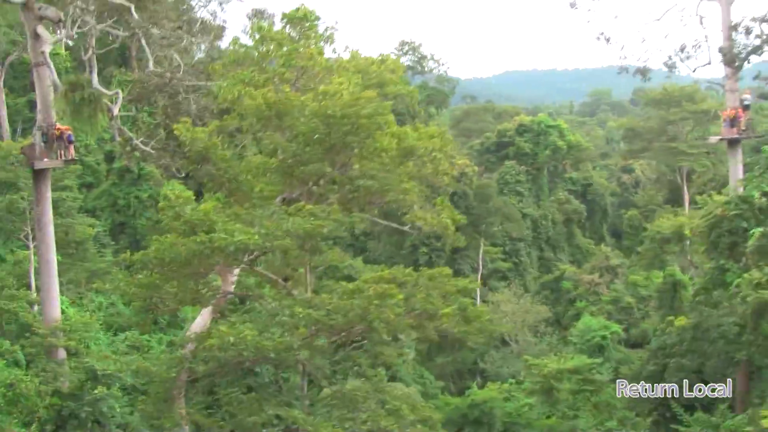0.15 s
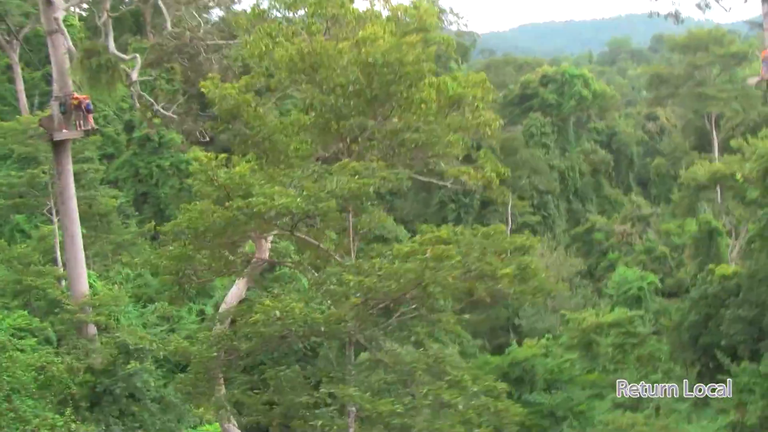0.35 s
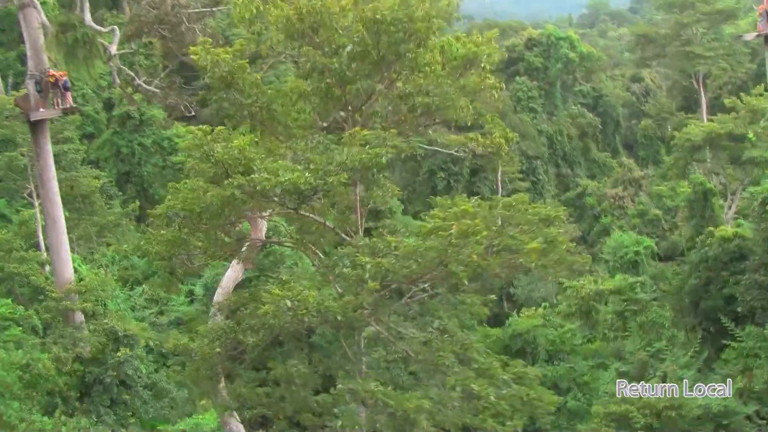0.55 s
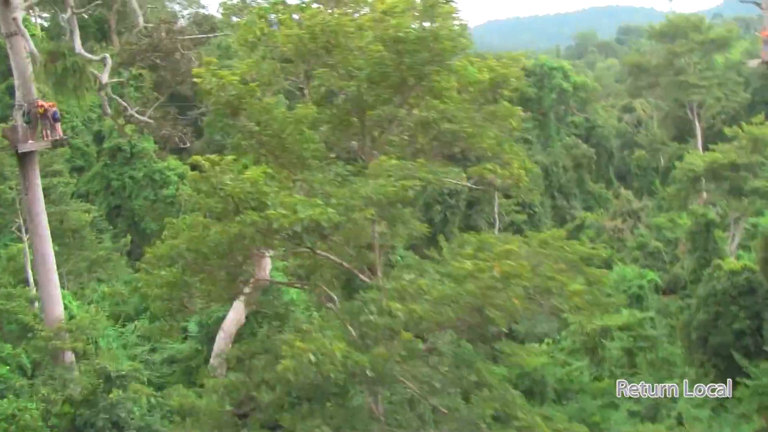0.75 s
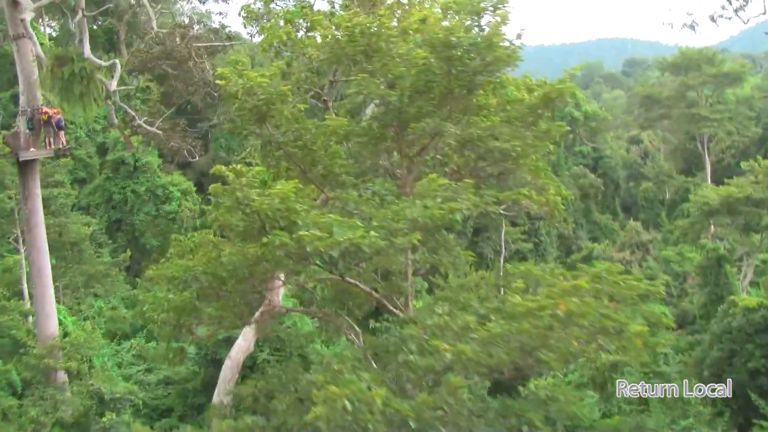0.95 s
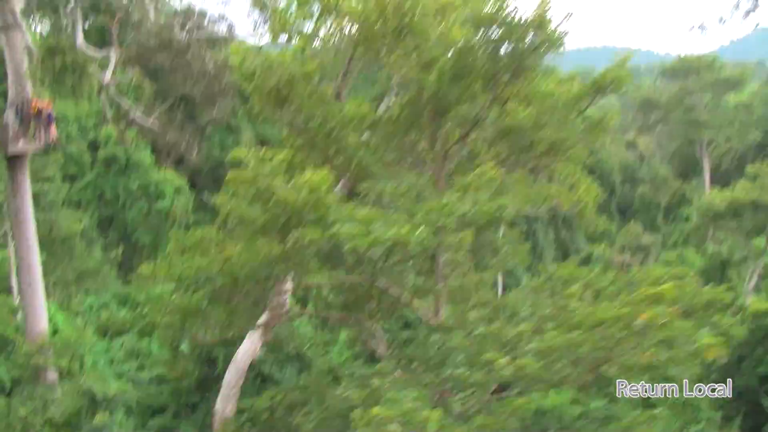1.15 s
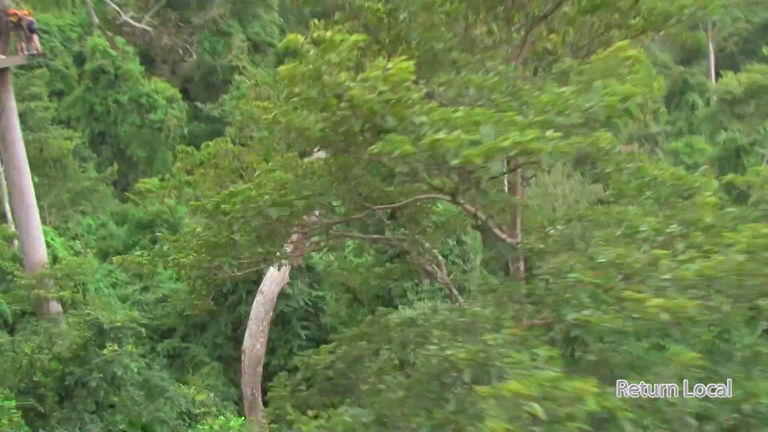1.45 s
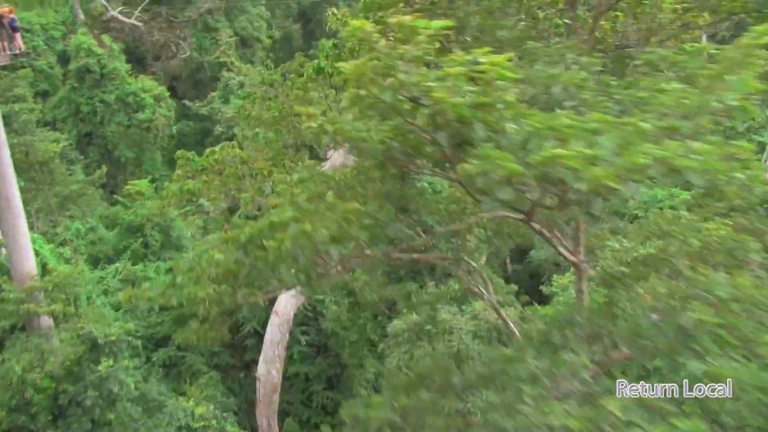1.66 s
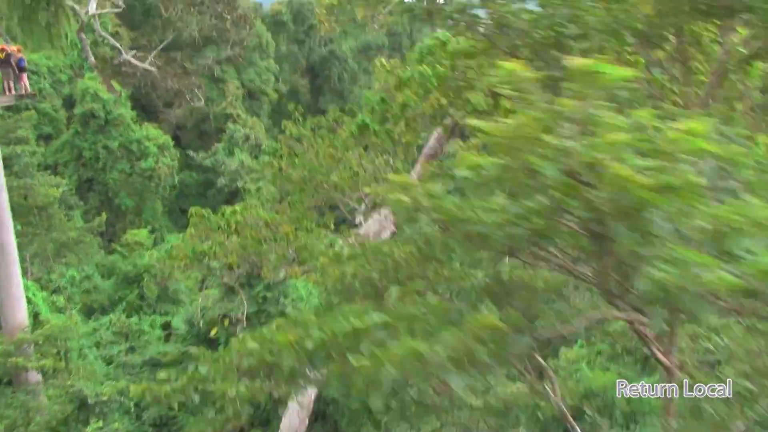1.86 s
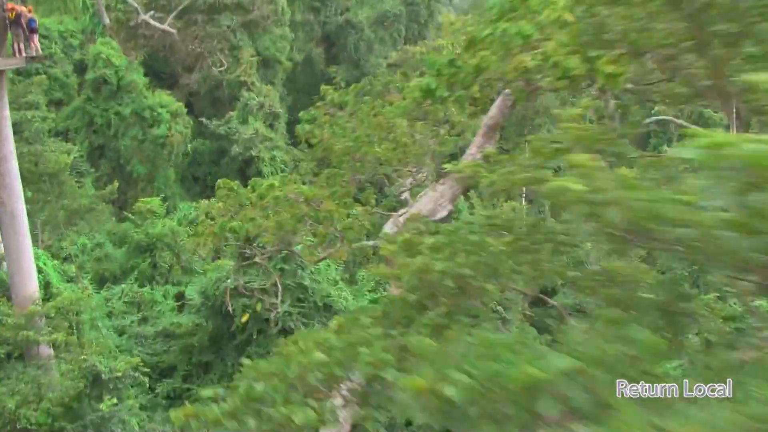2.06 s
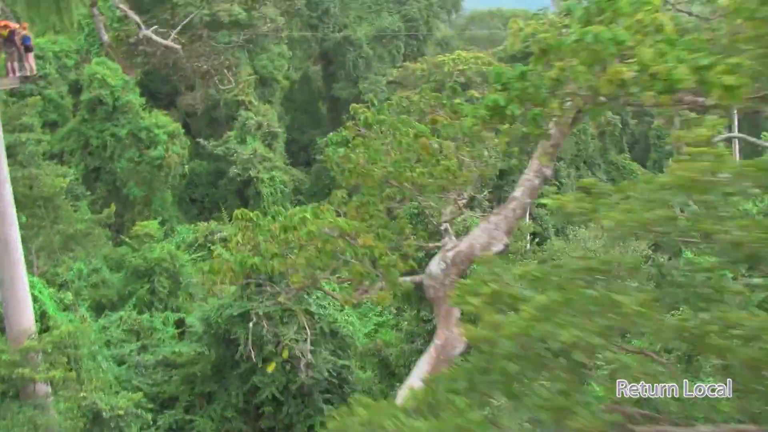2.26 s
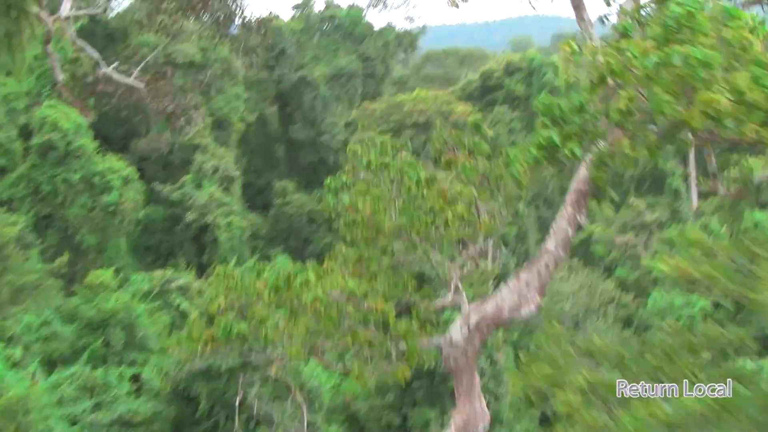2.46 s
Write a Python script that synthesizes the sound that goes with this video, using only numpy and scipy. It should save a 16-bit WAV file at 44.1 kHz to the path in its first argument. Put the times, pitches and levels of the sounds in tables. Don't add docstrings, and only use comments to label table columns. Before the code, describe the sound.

A steel pulley trolley races along a wire cable with a rough, ringing metallic whir and hiss.

```python
import sys
import numpy as np
from scipy import signal
from scipy.fft import rfft, irfft, next_fast_len
from scipy.io import wavfile
from scipy.ndimage import uniform_filter1d, map_coordinates

SR = 44100
rng = np.random.default_rng(int(sys.argv[2]) if len(sys.argv) > 2 else 0)


def pcm_store(signal):
    levels = np.round(np.clip(np.atleast_2d(signal), -1, 1) * 32767)
    wavfile.write(sys.argv[1], SR, levels.astype(np.int16).T)


N = 114660


def amp(db):
    return 10 ** (np.asarray(db) / 20)


def unit(x):
    return x / np.sqrt(np.mean(x ** 2) + 1e-20)


def along(points, hz):
    f, value = np.transpose(points)
    return np.interp(np.log(hz + 1), np.log(f + 1), value)


def curves(rows, t=None):
    if t is None:
        t = np.arange(N) / SR
    s, *columns = np.transpose(rows)
    return [np.interp(t, s, column) for column in columns]


def wobble(rate):
    return map_coordinates(rng.standard_normal(N // 16), [np.arange(N) * rate / SR])


def filtered(x, response):
    m = next_fast_len(N + SR // 2)
    hz = np.fft.rfftfreq(m, 1 / SR)
    return irfft(rfft(x, m) * response(hz), m)[..., :N]


# f/Hz, level/dB
LOUDER_LEFT = [(60, 8), (200, 7.5), (1000, 7.5), (2400, 10), (3400, 12.5), (4200, 11), (5800, 13)]


def balance(hz):
    left_and_right_share = np.array([[.25], [-.75]])
    return amp(along(LOUDER_LEFT, hz) * left_and_right_share)


# f/Hz, coherence 0-1
ALIKE = [(60, .99), (200, 1.), (2800, .997), (5000, .92), (6200, .5), (8200, .35), (10800, .4),
         (14800, .84)]
# f/Hz, phase/rad
LEAD = [(3000, 0), (3960, -.6), (5900, -.1), (7000, -2.4), (8800, -8), (9800, -9.7), (11600, -12.6),
        (15000, -12.3)]


def ports(pair):
    def alike(hz):
        return np.clip(along(ALIKE, hz), 0, 1)
    shared = filtered(pair[0], lambda hz: alike(hz) * np.exp(-1j * along(LEAD, hz)))
    own = filtered(pair[1], lambda hz: np.sqrt(1 - alike(hz) ** 2))
    return np.array([pair[0], shared + own])


# t/s, level/dB
WIND = [(0, -57), (.1, -63.5), (.9, -61.5), (1.3, -60), (1.55, -58.5), (1.7, -53.5), (1.91, -53.5),
        (2.05, -54.5), (2.6, -56)]
# f/Hz, level/dB per Hz
RUMBLE = [(15, -75), (25, -82), (155, -9), (275, -4.5), (530, -7.5), (576, -7), (700, -23), (910, -33),
          (1540, -120)]


def wind():
    air = filtered(rng.standard_normal((2, N)), lambda hz: amp(along(RUMBLE, hz) - 60 * (hz > 900)))
    return unit(air) * amp(curves(WIND)[0] + 0.98 * wobble(12.2))


# t/s, strands crossed a second/Hz
SPEED = [(0, 562), (.12, 566), (.29, 538), (.5, 575), (.72, 560), (.87, 578), (1.13, 570), (1.3, 555),
         (1.44, 594), (1.6, 572), (1.72, 582), (1.86, 582), (2.06, 550), (2.18, 577), (2.32, 576),
         (2.42, 566), (2.51, 582), (2.6, 577)]
# t/s, tone level/dB, octave level/dB
STRANDS = [(0, -69, -62), (.33, -65, -52), (.5, -67, -41), (.6, -66, -48), (.8, -61.5, -44),
           (1.15, -64, -50), (1.27, -56, -46), (1.46, -53, -55), (1.62, -57.5, -49), (1.76, -58.5, -40),
           (1.9, -70, -47), (1.98, -53.5, -46), (2.05, -64, -54), (2.12, -50, -46), (2.19, -55.5, -37.5),
           (2.26, -51, -45), (2.36, -56, -42.5), (2.6, -60, -45)]
# order, level/dB against the strand tone
LAY_ORDERS = [
    (3, -11.5),
    (5, -8.5),
]
STRAND_COUNT = 6
STRAND_JITTER, STRAND_WANDER = .011, .004
STRAND_FLUTTER_DB = 2.2


def strands():
    rate, = curves(SPEED)
    low_db, high_db = curves(STRANDS)
    unsteady = 1 + STRAND_JITTER * wobble(45) + STRAND_WANDER * wobble(14)
    phase = 2 * np.pi * np.cumsum(rate * unsteady) / SR
    tones = [(1, low_db), (2, high_db)]
    tones += [(order / STRAND_COUNT, low_db + db) for order, db in LAY_ORDERS]
    total = 0
    for k, db in tones:
        total = total + amp(db + STRAND_FLUTTER_DB * wobble(39.97)) * np.sin(k * phase)
    return np.sqrt(2) * total


WHEELBASE = 4.605
REPEAT, REPEAT_TOP_HZ = .36, 3600


def tandem(rough):
    later = np.arange(N) - WHEELBASE * SR / curves(SPEED)[0]
    again = np.array([map_coordinates(x, [later], mode='wrap') for x in rough])
    return rough + filtered(again, lambda hz: REPEAT / (1 + (hz / REPEAT_TOP_HZ) ** 4))


# random points a second/Hz, level/dB
GRIT_DB = [(69.8, 0.55), (24.8, -0.1), (180.3, 0.27), (608, 1.16)]
# t/s, half length/s, level/dB
LIFTS = [
    (1.235, .008, -2.5),
    (2.079, .01, -3.2),
]
WHEEL_HZ, WHEEL_DEPTH = 80, .055
LAY_DEPTH = 0.024


def rolling_contact():
    s = np.arange(N) / SR
    grit_db = sum(db * wobble(rate) for rate, db in GRIT_DB)
    wheel = np.sin(2 * np.pi * WHEEL_HZ * s + 0.95 * wobble(8.28))
    lay = np.sin(2 * np.pi * np.cumsum(curves(SPEED)[0]) / SR / STRAND_COUNT)
    turn = 1 + WHEEL_DEPTH * wheel + LAY_DEPTH * lay
    return ports(tandem(rng.standard_normal((2, N)) * amp(grit_db) * turn))


SKIRT = 1.35


def rings(peaks, f):
    total = 0
    for centre, width, db in peaks:
        damping = (f * width) ** 2
        total = total + amp(2 * db) * (damping / ((centre ** 2 - f ** 2) ** 2 + damping)) ** SKIRT
    return total


# f/Hz, width/Hz, level/dB
FRAME_AWAY = [(1080, 530, -11), (1820, 81, 1.5), (1990, 154, 6), (2580, 210, 0.5), (4170, 300, 3),
              (4650, 300, -13), (4870, 220, -5), (5750, 360, -18)]
FRAME_SWINGING = [(1170, 800, -9), (1870, 96, -1), (2005, 164, 5.5), (2760, 410, -2.5), (4210, 380, -1.5),
                  (4650, 340, -7), (4980, 320, -5), (5850, 530, -15)]
FRAME_ASIDE = [(1140, 1100, -10), (1940, 93, -2), (2040, 250, 5), (2700, 670, -4.5), (4160, 420, -2),
               (4500, 390, -5.5), (5140, 360, -7), (5650, 430, -15.5)]
FRAME_SQUARE = [(1400, 670, -9), (1910, 150, -2), (2090, 260, 2.5), (2720, 650, -5), (3850, 380, -3),
                (4580, 370, -1.5), (5200, 360, -8), (5700, 400, -16)]
FRAME_ACROSS = [(1430, 330, -4), (1940, 220, -6), (2110, 340, -2.5), (2740, 490, -2), (4050, 310, -9.5),
                (4610, 420, -4.5), (5370, 360, -8.5), (5700, 370, -13.5)]
FRAME_FACING = [(1260, 210, -3.5), (1793, 190, 1), (2400, 390, -3), (2695, 410, -3), (4150, 296, 3),
                (5070, 380, 1), (5420, 270, -9.5), (6300, 710, -21)]
FRAME_PAST = [(1310, 400, -7), (1813, 210, 4.5), (2520, 410, -2.5), (2840, 380, -5.5), (4225, 370, 2.5),
              (5180, 400, -3.5), (5740, 420, -6.5), (6500, 1100, -15)]
FRAME_BEHIND = [(1300, 300, -5), (1820, 220, 3), (2450, 380, -4), (2800, 380, -7), (4220, 340, 3.5),
                (5150, 330, 0), (5600, 380, -7), (6300, 900, -17)]
# f/Hz, level/dB per Hz
ROLL = [(150, -42), (300, -24.5), (640, -16), (1200, 3.5), (3400, -7.5), (4600, -7), (7000, -46),
        (16500, -58)]
ROLL_DB = -7.5


def frame_gain(hz, f, twist):
    sides = np.array([FRAME_AWAY, FRAME_SWINGING, FRAME_ASIDE, FRAME_SQUARE,
                      FRAME_ACROSS, FRAME_FACING, FRAME_PAST, FRAME_BEHIND])
    distance = abs(np.clip(twist, 0, len(sides) - 1) - np.arange(len(sides))[:, None])
    share = np.clip(1 - distance, 0, 1)
    ringing = rings(np.einsum('smk,st->mkt', sides, share), f)
    roll_db = along(ROLL, hz)
    low_cut = amp(np.minimum(2 * roll_db, 0) * (hz < 1000))
    power = ringing * low_cut[:, None] + amp(2 * (roll_db + ROLL_DB))[:, None]
    at_ports = balance(hz) / (1 + (130 / (hz + 1)) ** 4)
    return np.sqrt(power / np.mean(power, 0)) * at_ports[..., None]


# f/Hz, level/dB per Hz
HISS_LEFT = [(4500, -40), (6800, -20.5), (8300, -26.5), (9500, -23), (10600, -36), (13800, -30),
             (14800, -31), (16500, -27.5)]
HISS_RIGHT = [(4500, -46.5), (6800, -24.5), (7900, -24), (9700, -20), (10600, -29.5), (12000, -22),
              (13500, -31), (14800, -18)]
HISS_DB = 10
SHADE_DB, SHADE_HZ = -0.9, 12500


def hiss_db(hz, f, twist, bright_db):
    colour_db = np.array([along(HISS_LEFT, hz), along(HISS_RIGHT, hz)])[..., None]
    shade_db = SHADE_DB * twist / (1 + (SHADE_HZ / (f + 1)) ** 8)
    return colour_db + HISS_DB + bright_db + shade_db


# t/s, rolling level/dB, twist 0-7, resonance stretch (ratio), brightness level/dB
RIDE = [(0, -28, 0, 1.005, 1.5), (.2, -27.5, 0.1, 0.98, 1), (.42, -27.5, 1, 1.023, 0),
        (.6, -27.5, 1.4, 0.999, 0), (.78, -27.5, 2, 1.01, -1), (1.05, -28, 3, 0.99, 3.5),
        (1.2, -28, 3.5, 0.97, 2), (1.33, -27, 4, 1.014, -1), (1.48, -28, 4, 1.03, 3.5),
        (1.58, -28, 5, 1.004, 1.5), (1.72, -27.5, 5, 1.02, 3.5), (1.95, -28, 5, 0.99, 1),
        (2.07, -28.5, 5.2, 0.99, -1.5), (2.17, -27.5, 6, 1.02, 0), (2.35, -27, 6, 0.98, 1),
        (2.47, -28, 6, 1.015, 1.5), (2.54, -28, 7.5, 1, 1), (2.6, -27.5, 6.5, 0.98, 1)]
# random points a second/Hz, level/dB
HISS_GRIT_DB = [(22, 0.4), (45, 0.7)]
STEADY, STEADY_S = .7, .045


def trolley(patchy_db=0.83, hiss_patchy_db=2.5):
    hz, t, z = signal.stft(rolling_contact(), SR, nperseg=1024)
    _, twist, stretch, bright_db = curves(RIDE, t)
    f = hz[:, None] / np.clip(stretch, .8, 1.2)
    patches = uniform_filter1d(rng.standard_normal(z.shape[1:]), 14, 0)
    patches = unit(uniform_filter1d(patches, 10, 1))
    body = frame_gain(hz, f, twist) * amp(patchy_db * patches)
    hiss = amp(hiss_db(hz, f, twist, bright_db) + hiss_patchy_db * patches)
    ring = signal.istft(z * body, SR, nperseg=1024)[1][:, :N]
    air = signal.istft(z * hiss, SR, nperseg=1024)[1][:, :N]
    air = air * amp(sum(db * wobble(rate) for rate, db in HISS_GRIT_DB))
    swell = np.abs(uniform_filter1d(ring[0] ** 2, round(STEADY_S * SR))) ** (STEADY / 2)
    s = np.arange(N) / SR
    lift_db = sum(db * np.exp(-((s - at) / half) ** 4) for at, half, db in LIFTS)
    return unit((ring + air) / swell) * amp(curves(RIDE)[0] + lift_db + 0.84)


def scene():
    return filtered(ports(wind()) + strands(), balance) + trolley()


CEILING, KNEE = 0.37, 2.43
LEFT_TOP_HZ, RIGHT_TOP_HZ = 16520, 15060


def record(dry):
    soft = dry / (1 + abs(dry / CEILING) ** KNEE) ** (1 / KNEE)
    top_hz = np.array([[LEFT_TOP_HZ], [RIGHT_TOP_HZ]])
    return filtered(soft, lambda hz: (hz < top_hz) / (1 + (40 / (hz + 1)) ** 2))


dry = scene()
out = record(dry)
pcm_store(out)
```